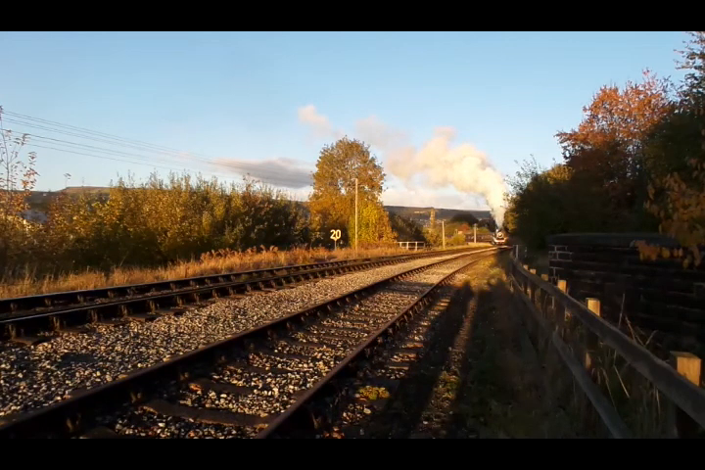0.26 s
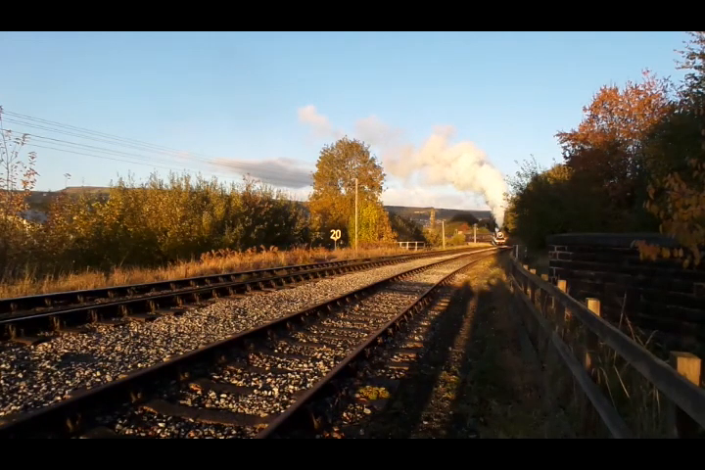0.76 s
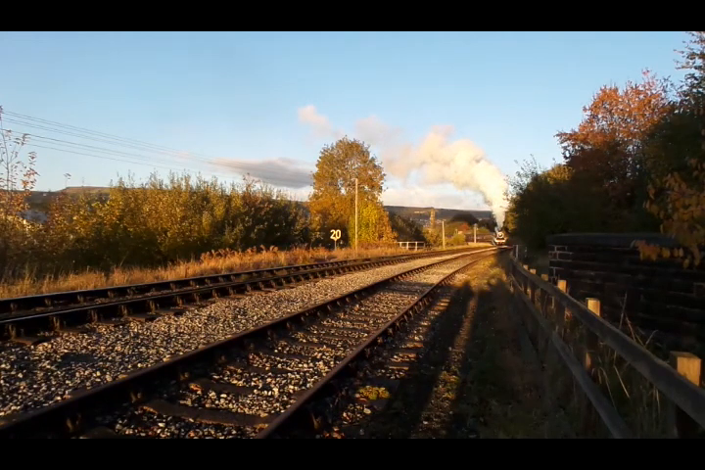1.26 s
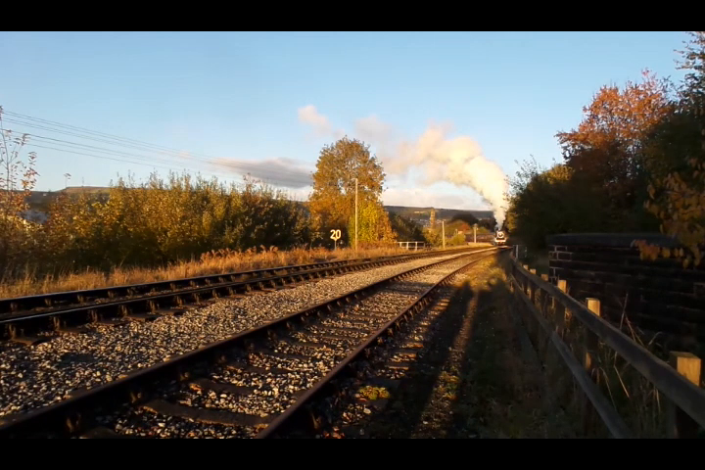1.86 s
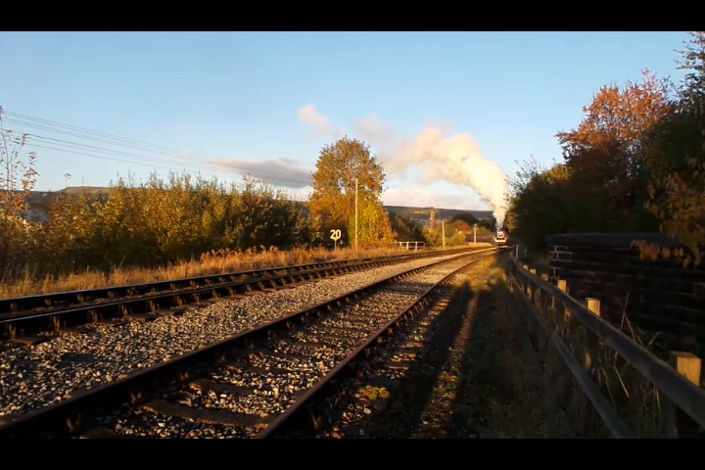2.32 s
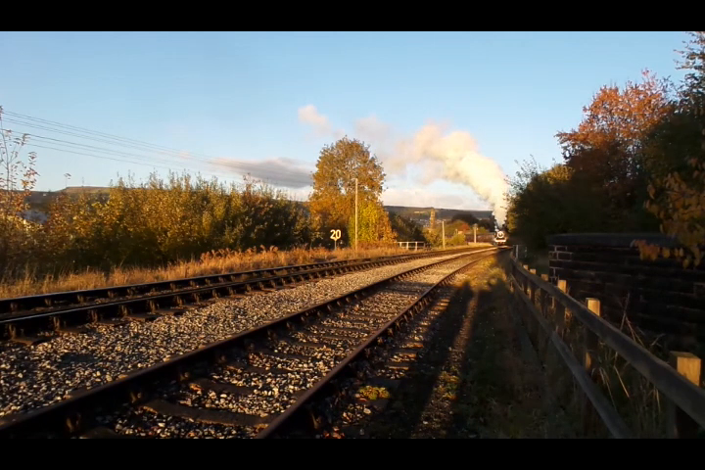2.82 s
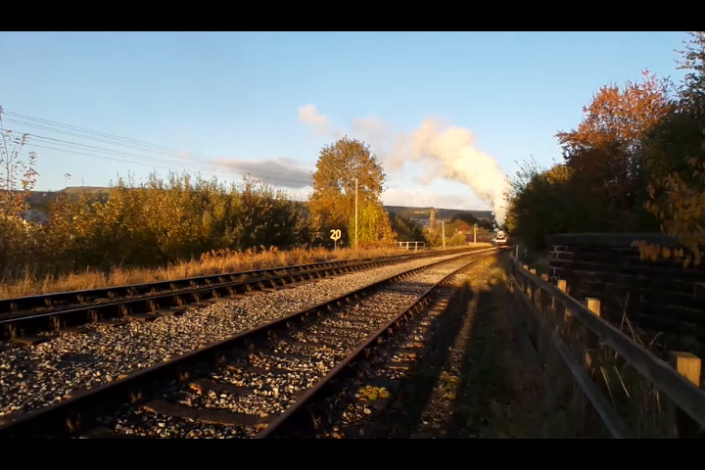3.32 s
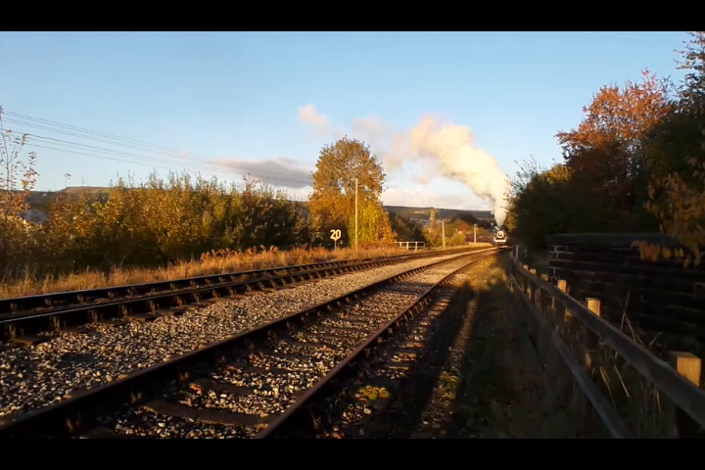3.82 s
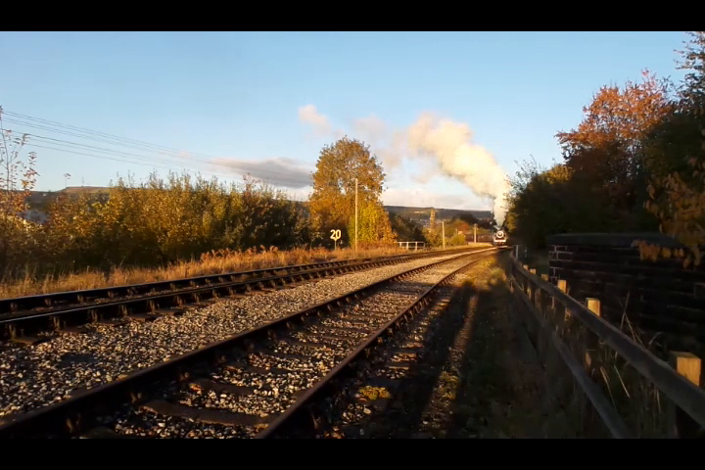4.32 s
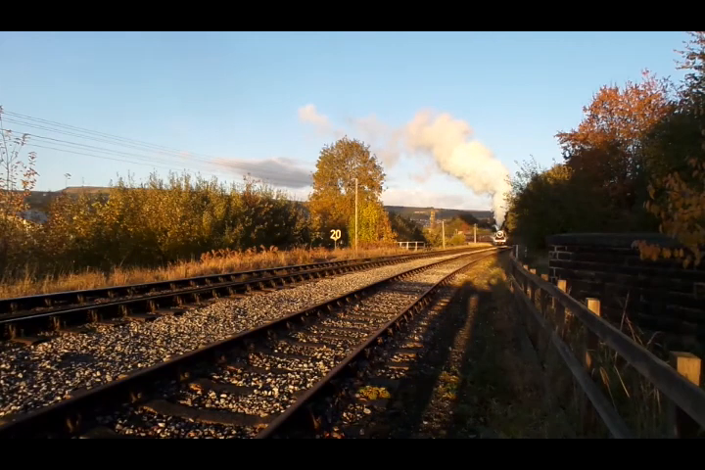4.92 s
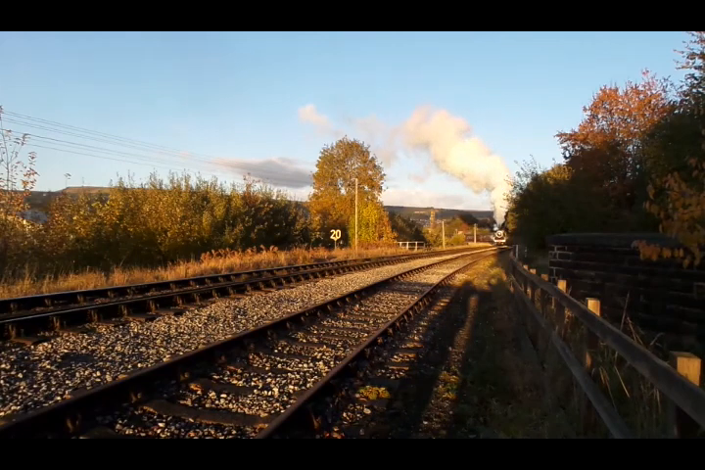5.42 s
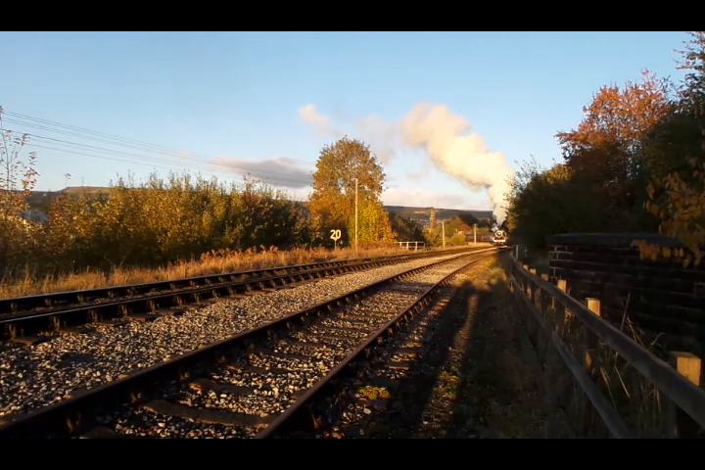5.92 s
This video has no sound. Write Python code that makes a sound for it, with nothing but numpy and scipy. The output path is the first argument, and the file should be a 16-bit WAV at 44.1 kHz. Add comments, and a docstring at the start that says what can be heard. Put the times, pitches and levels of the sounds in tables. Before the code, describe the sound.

A steam locomotive works closer outdoors with steady, slightly uneven chuffs, hoarse barking puffs over leaking steam hiss and a dull rolling rumble.

```python
"""A steam locomotive works towards a microphone beside the line, slowly gaining speed; only the right channel is live.
From the start wheels roll, steam leaks and a hum and whistle sing: shaped noise, and for the hum a wavering sine.
The first beat soon follows, then four to each wheel turn: noise puffs bark, rush and hiss, and trees and hillside answer.
About two seconds in the bark dips briefly; later the treble brightens, then eases a little at the end."""
import sys
import numpy as np
from scipy import signal
from scipy.fft import rfft, irfft, next_fast_len
from scipy.io import wavfile
from scipy.ndimage import uniform_filter1d, map_coordinates

SR = 44100
rng = np.random.default_rng(int(sys.argv[2]) if len(sys.argv) > 2 else 0)


def log_audio(samples):
    """Write samples as a 16-bit WAV file to the path given in sys.argv[1]."""
    # one column per channel
    frames = np.atleast_2d(samples).T
    # limit to full scale, then quantise
    limited = np.clip(frames, -1, 1)
    pcm = np.round(limited * 32767).astype(np.int16)
    wavfile.write(sys.argv[1], SR, pcm)


N = 272097


def amp(db):
    """Decibels to gain."""
    return 10 ** (np.asarray(db) / 20)


def unit(x):
    """Scale to rms 1."""
    return x / np.sqrt(np.mean(x ** 2) + 1e-20)


def curves(rows):
    """One value per sample for each column after the time."""
    knots_s, *columns = np.transpose(rows)
    t = np.arange(N) / SR
    return [np.interp(t, knots_s, column) for column in columns]


def wobble(rate):
    """A smooth random curve, rate knots a second."""
    knots = rng.standard_normal(int(N * rate / SR) + 4)
    return map_coordinates(knots, [np.arange(N) * rate / SR])


def filtered(x, response):
    """Multiply the spectrum of x by a response given as a function of frequency in Hz."""
    padded = next_fast_len(N + SR // 2)
    hz = np.fft.rfftfreq(padded, 1 / SR)
    return irfft(rfft(x, padded) * response(hz), padded)[..., :N]


def colour(hz, points, modes=()):
    """Gain of a smooth spectrum with resonant humps on it."""
    f, level_db = np.transpose(points)
    humps_db = sum(lift / (1 + (2 * (hz - centre) / width) ** 2) for centre, width, lift in modes)
    return amp(np.interp(np.log(hz + 1), np.log(f), level_db) + humps_db)


def noise(response):
    """Coloured noise of rms 1."""
    return unit(filtered(rng.standard_normal(N), response))


def below(hz, edge_hz, order=16):
    """Share of the power that a low-pass lets through; steep at the default order."""
    return 1 / (1 + (hz / edge_hz) ** order)


# spectrum of the exhaust jet: f/Hz, relative level/dB per Hz
JET_SPECTRUM = [(25, -31), (80, -9), (140, -22.5), (320, -14.5), (600, -8), (1500, -7), (2800, -11.5),
                (3900, 3), (4500, 2), (5600, -15.5), (6500, -22), (8000, -36.5), (11000, -60)]
# resonances of chimney and smokebox: f/Hz, width/Hz, lift/dB
CHIMNEY_MODES = [(198.8, 67, 10.5), (244.2, 76, 19), (357, 104, 6.5), (450.3, 108, 16), (690, 32, 0.5),
                 (790, 48, 4), (1076, 206, 9.5), (1698, 300, 4), (2190, 190, 5.5), (2630, 48, 7.5),
                 (3300, 82, 0.5), (3720, 43, -11), (3740, 72, -2)]
# a full beat as the engine nears the microphone: t/s, chimney bark level/dB, jet rush level/dB
BEAT_APPROACH = [(0, -23, -24), (1.7, -21.5, -22), (2.102, -25, -23), (3.1, -21.5, -22.6),
                 (3.9, -20.5, -23.5), (6.17, -20.5, -21.5)]
# treble as the engine nears, for nozzle hiss and in part the leak: t/s, level/dB
TREBLE_APPROACH = [(0, -8), (0.55, -5), (1.15, -5.5), (2.35, -2.5), (2.95, -0.5), (4.65, 0.94),
                   (6.17, -1.6)]
HISS_DB = -18  # full-beat hiss level, to which the treble level is added
HISS_FOLLOWS = 0.78  # share of a beat's strength (in dB) that the nozzle hiss follows


def exhaust(bark_edge_hz=600, hiss_edge_hz=3000, flutter_db=0.92, lump_db=1.13):
    """One turbulent jet: the chimney sounds first and longest, the nozzle hisses only at full flow."""
    crest_s, strength_db, bark_ebb_s = np.transpose(beats())
    when_s, bark_level_db, rush_level_db = np.transpose(BEAT_APPROACH)
    bark_db = strength_db + np.interp(crest_s, when_s, bark_level_db)
    rush_db = strength_db + np.interp(crest_s, when_s, rush_level_db)
    treble_db = np.interp(crest_s, *np.transpose(TREBLE_APPROACH))
    hiss_db = HISS_DB + HISS_FOLLOWS * strength_db + treble_db

    def jet(low_hz, high_hz):
        """Turbulent noise of the jet in one band."""
        def response(hz):
            band_power = np.abs(below(hz, high_hz) - below(hz, low_hz))
            return colour(hz, JET_SPECTRUM, CHIMNEY_MODES) * np.sqrt(band_power)
        return noise(response)

    # lead, rise and fall are in seconds
    bark = jet(1, bark_edge_hz) * puffs(bark_db, lead=0.021, rise=0.023, fall=bark_ebb_s, shape=2.52)
    rush = jet(bark_edge_hz, hiss_edge_hz) * puffs(rush_db, lead=0.0059, rise=0.029, fall=0.034, shape=1.68)
    hiss = jet(hiss_edge_hz, SR) * puffs(hiss_db, lead=0.001, rise=0.027, fall=0.023, shape=1.35)
    # eddies in the jet make each puff ragged
    lumpy_bark = bark * amp(lump_db * wobble(90))
    return (lumpy_bark + rush + hiss) * amp(flutter_db * wobble(170))


def puffs(levels_db, lead, rise, fall, shape):
    """Flow through the exhaust valve: at each beat it swells to a crest and ebbs as the cylinder empties."""
    t = np.arange(N) / SR
    power = np.zeros(N)
    ebbs_s = np.broadcast_to(fall, len(levels_db))
    for (crest_s, _, _), db, ebb_s in zip(beats(), levels_db, ebbs_s):
        near = np.abs(t - crest_s) < 0.25
        # the puff peaks ahead of the listed crest by its lead
        since_peak = t[near] - crest_s + lead
        span_s = np.where(since_peak < 0, rise, ebb_s)
        power[near] += amp(db) ** 2 * np.exp(-np.abs(since_peak / span_s) ** shape)
    return np.sqrt(power)


# four slightly uneven beats of a wheel turn: crest t/s in the first turn, strength level/dB, bark ebb/s
WHEEL_STROKES = [(0.225, 0, 0.063), (0.582, -2.5, 0.067), (0.959, -2.5, 0.067), (1.357, -0.63, 0.075)]
TURN_S, QUICKEN_S = 1.496, 0.0056  # length of the first wheel turn, and how much shorter each next one is


def beats():
    """The four strokes come round with every wheel turn: rows of (crest s, strength dB, bark ebb s)."""
    turns = np.arange(int(N / SR / TURN_S) + 1)
    lengths_s = TURN_S - QUICKEN_S * turns
    starts_s = np.cumsum(lengths_s) - lengths_s
    return [(start + crest * length / TURN_S, db, ebb)
            for start, length in zip(starts_s, lengths_s)
            for crest, db, ebb in WHEEL_STROKES]


# spectrum of the leaking steam: f/Hz, relative level/dB per Hz
LEAK_SPECTRUM = [(1500, -39), (2900, -13.5), (3600, -3), (4400, 0), (5600, -15), (7200, -24), (9000, -35.5),
                 (11000, -53), (14500, -67)]
# half-whistled tones of the leak: f/Hz, width/Hz, lift/dB
LEAK_TONES = [(4155, 93, 3.5), (4482, 110, 8.3), (4693, 91, 7), (4880, 99, 1.5), (5360, 170, 4.5),
              (5880, 100, 6), (6400, 210, 5)]


def leaking_steam(base_db=-32, swing_db=1.78, crest_turn=0.44, treble_follow=0.62):
    """Escaping steam hisses and half whistles, swelling at the steady period of the first wheel turn."""
    treble_db, = curves(TREBLE_APPROACH)
    turn = np.arange(N) / SR / TURN_S
    swell_db = swing_db * np.cos(2 * np.pi * (turn - crest_turn))
    level_db = base_db + treble_follow * treble_db + swell_db
    leak = noise(lambda hz: colour(hz, LEAK_SPECTRUM, LEAK_TONES))
    return leak * amp(level_db + 0.6 * wobble(22))


# spectrum of wheels and draught: f/Hz, relative level/dB per Hz
ROAR_SPECTRUM = [(25, -17), (70, 0), (160, -1.5), (330, -3), (450, 3.5), (750, -3), (1300, -4),
                 (2800, -8.5), (4500, -34)]
# hollow tones in the roar: f/Hz, width/Hz, lift/dB
ROAR_TONES = [(239.4, 67, 12), (1005, 98, 6.5)]


def rolling_roar(base_db=-36):
    """Wheels and draught make a dull, resonant noise whose level wavers slightly."""
    roar = noise(lambda hz: colour(hz, ROAR_SPECTRUM, ROAR_TONES))
    return roar * amp(base_db + 0.3 * wobble(21.88))


# the two thin tones at the microphone: t/s, hum level/dB, steam whistle level/dB
TONE_LEVELS = [(0, -50, -51), (0.8, -45.5, -50.5), (1.55, -54, -50), (2.5, -43, -49), (4.5, -45, -46.5),
               (6.17, -46.5, -51)]
HUM_HZ, WHISTLE_HZ = 513, 3034


def singing(drift_hz=0.81, waver_db=1.6, whistle_width_hz=50):
    """A low sine hums while a narrow band of noise makes a breathy steam whistle; both waver at random."""
    hum_db, whistle_db = curves(TONE_LEVELS)
    phase = 2 * np.pi * np.cumsum(HUM_HZ + drift_hz * wobble(14)) / SR
    hum = unit(np.sin(phase)) * amp(hum_db + waver_db * wobble(6.08))
    whistle = noise(lambda hz: 1 / (1 + (2 * (hz - WHISTLE_HZ) / whistle_width_hz) ** 2))
    return hum + whistle * amp(whistle_db + 1.2 * wobble(9))


def hillside(x, t60=0.9, delay=0.031, dull_hz=4000):
    """Trees and slopes scatter a dull, late answer: it builds up over delay (s) and dies away over t60 (s)."""
    t = np.arange(SR) / SR
    envelope = amp(-60 * t / t60) * (1 - np.exp(-(t / delay) ** 2))
    tail = rng.standard_normal(SR) * envelope
    answer = signal.fftconvolve(x, tail / np.linalg.norm(tail))[:N]
    return filtered(answer, lambda hz: np.sqrt(below(hz, dull_hz, order=2)))


# very top of the sound, veiled and cleared by the air on its way to the microphone: t/s, level/dB
AIR_SHEEN = [(0, 2), (1.35, 0), (2.1, -1), (3, 2.7), (4, 0.9), (6.17, -0.5)]
SHEEN_EDGE_HZ = 4800


def through_air(x, ripple_db, ripple_edge_hz=500):
    """Shifting paths through the air cut a slowly changing ripple into the spectrum and veil or clear its top."""
    hz, t, spectrum = signal.stft(x, SR, nperseg=1024)
    # smooth the random field across frequency, then across time
    field = uniform_filter1d(rng.standard_normal(spectrum.shape), size=3, axis=0)
    field = uniform_filter1d(field, size=14, axis=1)
    ripple = ripple_db * unit(field) * (1 - below(hz, ripple_edge_hz, order=2))[:, None]
    sheen = np.outer(1 - below(hz, SHEEN_EDGE_HZ), np.interp(t, *np.transpose(AIR_SHEEN)))
    return signal.istft(spectrum * amp(ripple + sheen), SR, nperseg=1024)[1][:N]


def scene():
    """Engine, train and hillside reach the right channel; the left stays empty."""
    chuffs = through_air(exhaust(), ripple_db=2.5)
    answer = amp(-14.5) * hillside(chuffs)
    running = through_air(leaking_steam() + rolling_roar(), ripple_db=1.5)
    live = chuffs + answer + running + singing()
    return np.array([np.zeros(N), live])


# electronic hiss of the recorder: f/Hz, relative level/dB per Hz
RECORDER_HISS = [(20, 1), (100, 0.5), (300, -9), (1000, -16), (3000, -20), (8000, -20.5), (15000, -21.5)]
TOP_HZ = 15720  # band limit of the recorder


def record(dry):
    """The recorder adds its own faint hiss to both channels and keeps nothing above its band limit."""
    hiss = np.array([noise(lambda hz: colour(hz, RECORDER_HISS)) for _ in dry])
    return filtered(dry + amp(-66.5) * hiss, lambda hz: hz < TOP_HZ)


dry = scene()
out = record(dry)
log_audio(out)
```